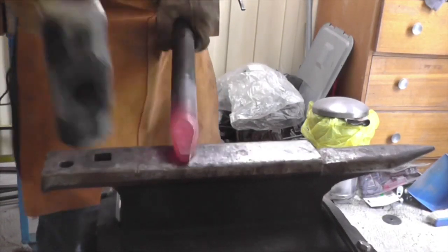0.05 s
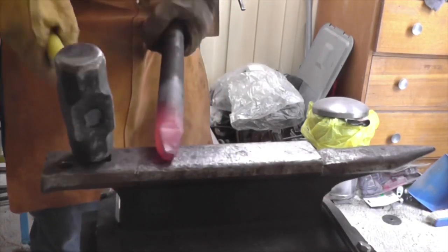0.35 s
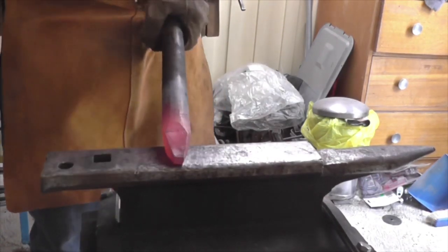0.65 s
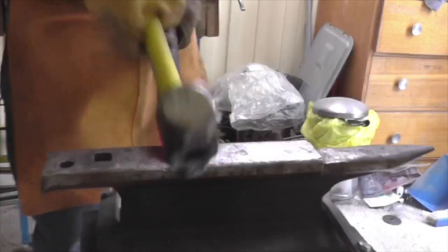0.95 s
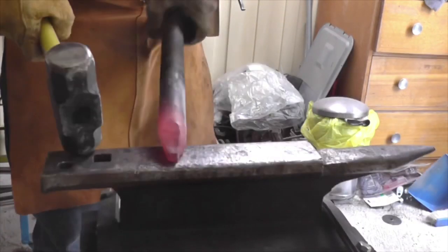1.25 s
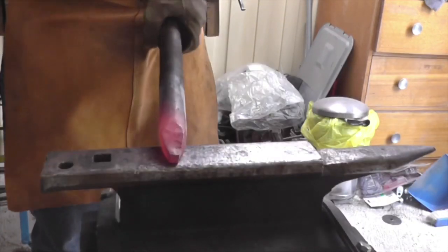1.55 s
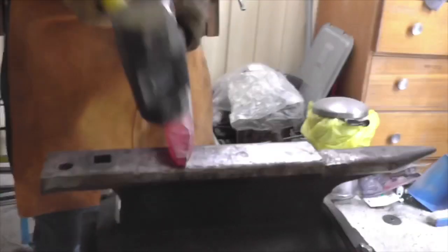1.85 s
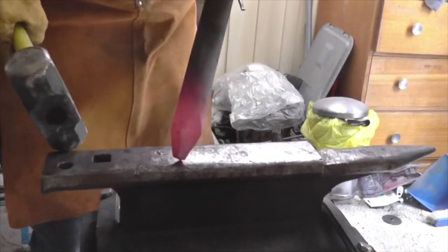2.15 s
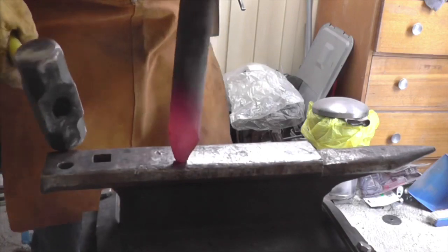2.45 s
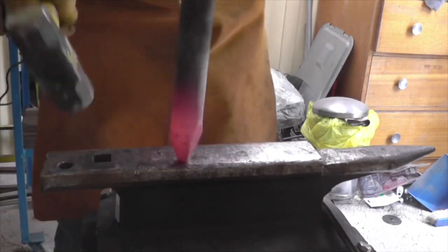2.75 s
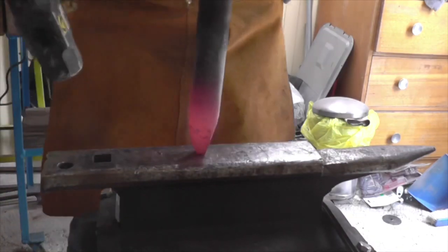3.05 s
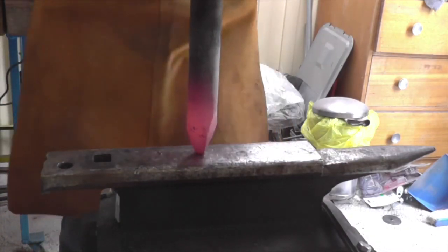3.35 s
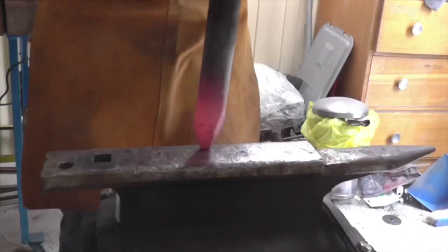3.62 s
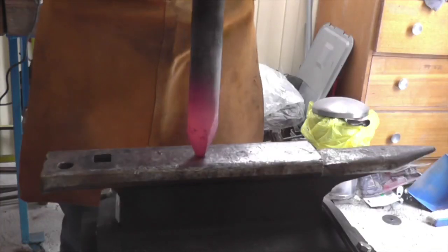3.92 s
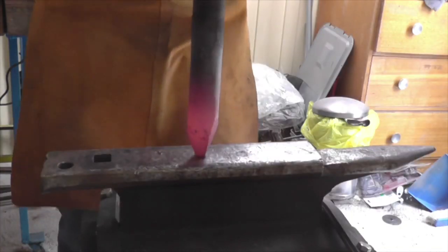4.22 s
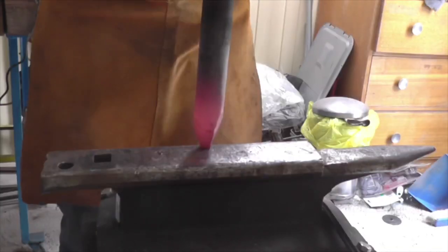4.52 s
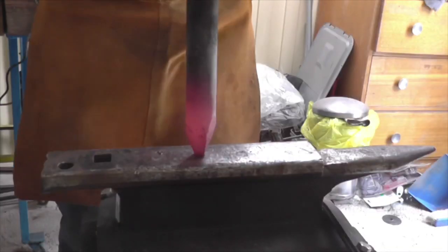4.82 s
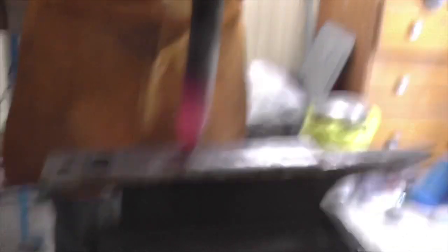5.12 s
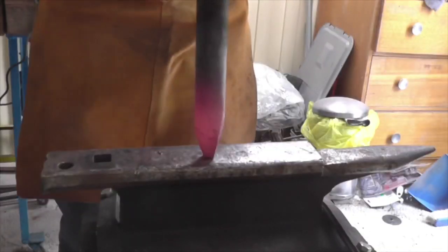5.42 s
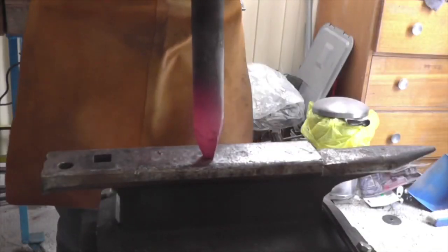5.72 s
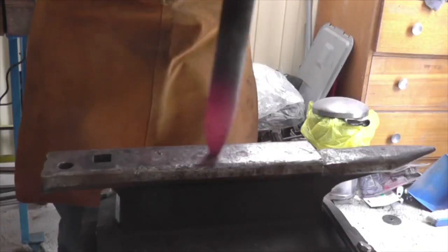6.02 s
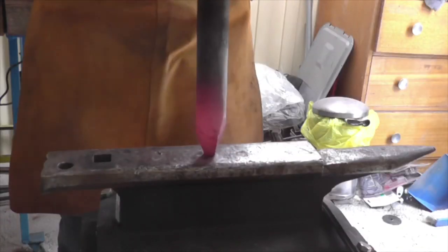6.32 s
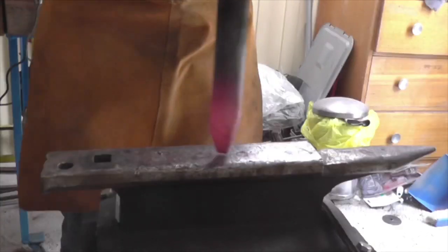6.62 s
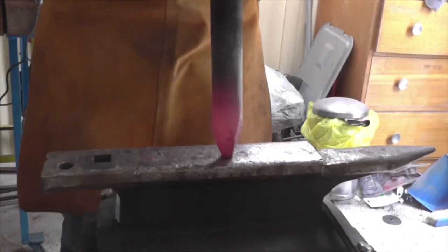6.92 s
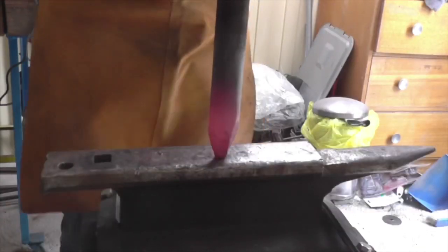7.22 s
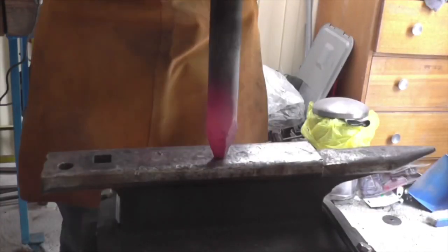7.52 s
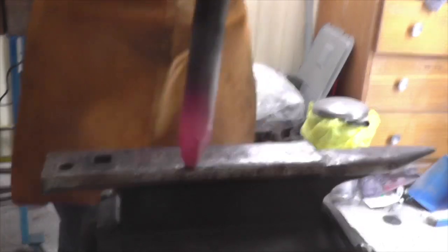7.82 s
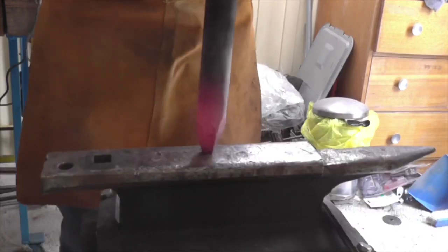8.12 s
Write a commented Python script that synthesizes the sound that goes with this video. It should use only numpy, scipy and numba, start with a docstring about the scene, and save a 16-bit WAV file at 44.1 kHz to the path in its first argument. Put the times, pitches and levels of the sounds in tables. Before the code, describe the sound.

A gas forge roars steadily in a small workshop. Right at the start, then at about 1 and 1.9 seconds, a hammer lands heavily on a hot steel bar on an anvil, each blow a sharp crash with a short ring and a dull knock. After each, the hammer is set down with a light clank, at about 0.3, 1.3 and 2.1 seconds. Following a pause, seven ringing blows hit the upright bar at roughly 3.5, 4.3, 5.2, 5.8, 6.5, 7.2 and 7.8 seconds, the first with a very short, shrill squeal. The bar's tip drops back onto the anvil with lighter clanks between many of the blows, and once more at about 8.1 seconds. The strikes are close and loud, with a brief room echo. Each one pushes the overall volume down, so the forge's roar ducks and swells back.

```python
"""A gas forge roars in a small workshop while a smith hammers a red-hot steel bar on an anvil.
First come three heavy blows on the bar lying flat; after each, the hammer is set down with a clank.
From 3.5 s come seven ringing blows on the upright bar, the first with a squeal of sliding steel.
Between blows, and once at the end, the bar's tip drops back on the anvil with a lighter clank.
All along, each blow drives the camera's automatic gain down, so the roar ducks and swells back."""
import sys
import numpy as np
from scipy import signal
from scipy.fft import rfft, irfft, next_fast_len
from scipy.io import wavfile
from scipy.ndimage import uniform_filter1d, map_coordinates
from numba import njit

SR = 44100
rng = np.random.default_rng(int(sys.argv[2]) if len(sys.argv) > 2 else 0)


def digitize_waveform(pressure):
    """Quantize a signal to 16-bit integers and store it at the path in sys.argv[1].

    Rows of a 2-D input are taken as channels; values are limited to [-1, 1].
    """
    field = np.atleast_2d(pressure).T
    bounded = np.clip(field, -1, 1)
    quanta = np.round(bounded * 32767).astype(np.int16)
    wavfile.write(sys.argv[1], SR, quanta)


N = 368676
AGE = np.arange(SR) / SR  # seconds since a hit


def hammer_blows():
    """Each blow crashes, rings anvil and bar, knocks the stand and jolts the camera through the floor."""
    # t/s, how the bar is held, force/dB, how firmly it sits on the anvil/dB, floor jolt/dB
    blows = [(0.0222, "flat", 21, 8.5, -8), (0.9666, "flat", 23, 0.5, -1), (1.8529, "flat", 21.5, 3, -17),
             (3.5394, "upright", 20.5, 6.5, -8), (4.3478, "upright", 20.5, 2, 1),
             (5.1794, "upright", 20.5, 1.5, -23), (5.8497, "upright", 19, -8, -17),
             (6.544, "upright", 20, 0, -7), (7.1904, "upright", 21.5, 4.5, -3),
             (7.8288, "upright", 20, 0.5, -8)]
    # ringing tones: f/Hz, level/dB, fade time/s (before the length factors below)
    anvil_tones = [(2722, -5, .55), (9590, -19, .25), (13940, -32, .6), (15615, -21, .2), (4130, -22, .18),
                   (4468, -19, .22), (6680, -24, .2)]
    flat_tones = [(399, -9, 0.11), (1085, -10, .1), (1865, -7, .1), (2610, 2, 0.099), (3230, -6, .12),
                  (6850, -4, 0.081)]
    upright_tones = [(3335, 0, .15), (4405, -15, .17), (5850, -13, .17), (10740, -16, .16),
                     (12770, -14, .14), (13945, -15, .15), (3900, -20, .15), (4150, -17, .15),
                     (4520, -17, .14), (4950, -21, .14), (5760, -18, .15), (6750, -19, .15),
                     (8576, -21, .14), (10050, -21, .15)]
    # tone colour of the crash: f/Hz, level/dB
    crash_colour = [(30, -8), (150, 3.5), (400, 5.5), (1200, 5.5), (2200, 3), (3000, 2.5), (4200, 4),
                    (5200, 2.5), (8000, 3), (10800, 5), (11800, 2.5), (14200, 5.5), (15500, -3.5)]
    # A flat bar passes the blow on to the stand; an upright one rings.
    # bar tones, bar level/dB, knock level/dB, anvil length factor, crash top treble/dB
    holds = {"flat": (flat_tones, -7.5, -11, .66, -3.5), "upright": (upright_tones, -2.8, -20, 0.44, -1.5)}
    cooling_db_per_s = .55  # as the bar cools and hardens, its low tones ring more strongly
    out = np.zeros((2, N))
    for start, hold, force_db, seat_db, jolt_db in blows:
        bar_tones, bar_db, knock_db, length, top_db = holds[hold]
        colour = [(hz, db + top_db * (hz > 11300)) for hz, db in crash_colour]
        crash = impact(colour, crack_t60=0.053, room_db=-8.5)
        length *= 2 ** (-seat_db / 13.5)  # a firmer seat drives the anvil harder but stops it sooner
        anvil = amp(seat_db - 10.5) * ring(anvil_tones, attack=0.0095, rough=0.77, left_db=4, length=length)
        cooled = [(hz, db + cooling_db_per_s * start * (hz < 3600), t60) for hz, db, t60 in bar_tones]
        bar = amp(bar_db) * ring(cooled, attack=0.0086, rough=.85, left_db=4.5, length=0.85)
        knock = amp(knock_db) * stand_knock()
        thump = amp(jolt_db) * floor_jolt()
        add(out, start, amp(force_db) * (crash + anvil + bar + knock + thump + chirp()))
    return out


def impact(colour, crack_t60, room_db):
    """Steel hits steel: a short crack of many packed tones, then the workshop's fading echo."""
    # f/Hz, how alike left and right are (1 = the same)
    likeness = [(100, 0.087), (600, 0.55), (3000, 0.4), (8000, 0.99), (14000, 0.63)]
    # the workshop's echo: f/Hz, fade time/s
    room_fade = [(60, 0.24), (400, 0.15), (1500, 0.27), (5000, 0.24), (10000, 0.22), (15500, 0.18)]
    burst = noise(lambda hz: along(colour, hz), likeness, SR, ripple_db=3.5)
    hz, t, bands = signal.stft(burst, SR, nperseg=256)
    decay = np.exp(-np.log(1000) * t / along(room_fade, hz)[:, None])
    echo = signal.istft(bands * decay, SR, nperseg=256)[1][:, :SR]
    return (burst * fade(crack_t60) + amp(room_db) * echo) * (1 - np.exp(-AGE / 0.00011))


def ring(tones, attack, rough, left_db, length=1, count=4):
    """Struck steel rings in fading tones; close neighbours make each waver differently left and right."""
    out = np.zeros((2, SR))
    for hz, db, t60 in tones:
        age = AGE[:int(SR * min(1, 1.5 * t60))]
        near_hz = hz * (1 + .008 * rng.standard_normal((count, 1)))
        weights = rng.standard_normal((2, count))
        neighbours = weights @ np.sin(2 * np.pi * (near_hz * age + rng.random((count, 1))))
        wave = np.sin(2 * np.pi * (hz * age + rng.random())) + rough * neighbours / np.sqrt(count)
        add(out, 0, amp(db + rng.uniform(1.5, 3)) * fade(t60 * length)[:len(age)] * wave)
    return out * (1 - np.exp(-AGE / attack)) * amp([[left_db / 2], [-left_db / 2]])


def stand_knock():
    """The anvil's stand takes the blow with a dull knock."""
    thud = filtered(rng.standard_normal(SR),
                    lambda hz: hz ** 2 / (hz ** 2 + 330 ** 2) / (1 + (hz / 1200) ** 4))
    return unit(thud) * fade(0.15)


def floor_jolt():
    """A low thump through the floor shakes the two microphones against each other."""
    rumble = filtered(rng.standard_normal(SR), lambda hz: 1 / (1 + (hz / 110) ** 2))
    return unit(rumble) * fade(0.061) * np.array([[1], [-.3]])


def chirp():
    """A short rising chirp follows a blow and ends in a faint falling ping."""
    out = amp(-13) * glide(hz=1468, hz_per_s=2400, attack=0.015, t60=.16)[None]
    add(out, .086, amp(-28.5) * glide(hz=1895, hz_per_s=-570, attack=.007, t60=0.16))
    return out


def skid():
    """The bar's point slides under the first upright blow with a very short, shrill squeal."""
    out = np.zeros((2, N))
    add(out, 3.5392, ring([(10700, 28, 0.023)], attack=0.00055, rough=0.4, left_db=1))
    return out


def hammer_rests():
    """The hammer head is set down on the anvil and rings briefly."""
    # t/s, force/dB, click/dB, ring/dB
    rests = [(.3218, -3, 1, -6), (1.2656, 0.5, -0.5, -9), (2.1386, -4.5, 5, -7)]
    # the head's tones: f/Hz, level/dB, fade time/s
    head_tones = [(2046, -1, .09), (3340, -10, .12), (4245, 0, .09), (3900, -10, .09), (6150, -9, .12),
                  (6720, -12, .07), (8750, -8, .06), (9950, -16, .07)]
    # tone colour of its click: f/Hz, level/dB
    click_colour = [(100, -30), (300, 2), (1600, 3), (2500, -4), (4400, -0.5), (5300, -11.5), (6700, -4),
                    (8000, -18), (8800, -13), (11000, -16), (15500, -26)]
    return taps(rests, head_tones, click_colour)


def tip_drops():
    """The bar's tip drops back on the anvil and rings briefly."""
    # t/s, force/dB, click/dB, ring/dB
    drops = [(1.3424, -16, 4, 9), (3.056, -19.5, -17, -3), (3.9795, -4.5, 1.5, 2), (4.6968, -13.5, -8, -3),
             (5.3952, -2, -4.5, -6), (6.1056, -9, -4, -4.5), (6.7222, -3, -6.5, -6),
             (8.1212, -3.5, -17, -2.5)]
    # the tip's tones: f/Hz, level/dB, fade time/s
    tip_tones = [(2280, -5.5, 0.098), (3400, -12, 0.19), (3900, -20, 0.16), (4230, -28, 0.18),
                 (6100, -26, 0.24), (9900, -24, .1), (11000, -32, 0.12)]
    # tone colour of its click: f/Hz, level/dB
    click_colour = [(100, -16), (800, -10), (1600, 6), (2800, -7.5), (5000, -5), (7000, -11), (9000, -21),
                    (10800, -8), (15500, -30)]
    return taps(drops, tip_tones, click_colour)


def taps(contacts, tones, colour):
    """Each light hit makes a click, a dull clank and the ring of the piece that lands."""
    # tones of steel touching loosely: f/Hz, level/dB, fade time/s
    clank_tones = [(273, -21, 0.15), (855, -3, 0.042), (1492, -5, 0.068), (1550, -8, 0.14),
                   (1661, -3.5, 0.085), (1680, -16, .07), (1896, -14.5, 0.11), (2710, -19.5, 0.21)]
    out = np.zeros((2, N))
    for start, force_db, click_db, ring_db in contacts:
        click = amp(click_db) * impact(colour, crack_t60=0.034, room_db=-17.5)
        clank = amp(-2.0) * ring(clank_tones, attack=0.00023, rough=0.43, left_db=0)
        steel = amp(ring_db - 3.5) * ring(tones, attack=0.00044, rough=0.59, left_db=4.5)
        add(out, start, amp(force_db) * walls(click + clank + steel, echo_db=-18.0))
    return out


def walls(x, echo_db, count=8):
    """Near walls and furniture send back weak, quick echoes, different at each microphone."""
    out = x.copy()
    for delay, gain in zip(rng.uniform(.008, .036, count), rng.normal(1, .3, (count, 2, 1))):
        add(out, delay, amp(echo_db) * gain * x)
    return out


def forge():
    """The swirling gas flame roars in a chamber that boosts some pitches and weakens others."""
    # broad roar and gas hiss: f/Hz, level/dB
    flame = [(25, -15), (100, -27), (200, -15), (300, -10.5), (420, 2.5), (850, -0.5), (1350, -8.5),
             (1650, -16.5), (2700, -24), (4500, -24.5), (6500, -19.5), (9800, -22), (11800, -35),
             (15500, -48.5)]
    # the chamber's peaks and dips: f/Hz, width/Hz, boost/dB
    chamber = [(153.6, 45, 10), (257, 34.6, 12.5), (341, 32, 8.5), (422.4, 50, 4.5), (531.6, 14, 8),
               (599, 35, 7), (637, 73, -10), (687.5, 63, 10.5), (710, 20, -3.5), (797.7, 50.7, 10),
               (884.5, 53, 6), (975, 20, -19), (1039, 30, 10.5), (1095, 26, 6.5), (1236, 30, 7),
               (1396.4, 61, 11), (1823, 30, 12.5), (3335, 87, 13.5)]
    # f/Hz, how alike left and right are (1 = the same)
    likeness = [(60, -1.05), (120, 0.26), (240, 0.98), (480, 0.99), (950, 0.98), (1890, 0.71), (3770, 0.49),
                (7520, 0.77), (15000, 0.62)]
    # f/Hz, left over right/dB
    balance = [(60, 4), (110, 2.5), (200, -0.5), (380, -0.5), (700, -1.0), (1290, -2.0), (2380, 0.5),
               (4400, -0.5), (8120, -2), (15000, 1)]
    def colour_db(hz):
        peaks_db = sum(db * 2 ** -((2 * (hz - centre) / width) ** 2) for centre, width, db in chamber)
        return along(flame, hz) + peaks_db
    roar = noise(colour_db, likeness, N, ripple_db=5)
    roar = filtered(roar, lambda hz: amp(along(balance, hz) * np.array([[.5], [-.5]])))
    return amp(-14.0 + 0.62 * wobble(22, N)) * roar


def noise(colour_db, likeness, size, ripple_db):
    """Stereo noise with a given tone colour and left-right likeness; echoes ripple its treble."""
    grid_hz = np.arange(0, SR, 28)
    comb = np.minimum(rng.standard_normal(len(grid_hz)), 1)  # echoes cut deep dips but boost little
    def response(hz):
        angle = np.arccos(np.clip(along(likeness, hz), -1, .995)) / 2
        ripple = ripple_db * np.interp(hz, grid_hz, comb) * np.interp(hz, [3000, 5000], [0, 1])
        return amp(colour_db(hz) + ripple) * np.array([np.cos(angle), np.sin(angle)])
    mid, side = filtered(rng.standard_normal((2, size)), response)
    return unit(np.array([mid + side, mid - side]))


def glide(hz, hz_per_s, attack, t60):
    """A tone that swells and dies while its pitch slides at a steady rate."""
    return np.sin(2 * np.pi * (hz + hz_per_s * AGE / 2) * AGE) * (1 - np.exp(-AGE / attack)) * fade(t60)


def fade(t60):
    """Die away by 60 dB in t60 seconds, the fade time."""
    return np.exp(-np.log(1000) * AGE / t60)


def amp(db):
    """Turn decibels into a volume factor."""
    return 10 ** (np.asarray(db) / 20)


def unit(x):
    """Scale a sound to an average power of 1."""
    return x / np.sqrt(np.mean(x ** 2) + 1e-20)


def along(points, hz):
    """Read between (f/Hz, value) points, with octaves evenly spaced."""
    freqs, values = np.transpose(points)
    return np.interp(np.log(hz + 1), np.log(freqs), values)


def wobble(rate, size):
    """A smooth curve through rate random points a second."""
    return map_coordinates(rng.standard_normal(4096), [np.arange(size) * rate / SR], mode="wrap")


def filtered(x, response):
    """Scale each frequency in x by response(hz)."""
    size = x.shape[-1]
    padded = next_fast_len(size + 8192)
    return irfft(rfft(x, padded) * response(np.fft.rfftfreq(padded, 1 / SR)), padded)[..., :size]


def add(track, start, sound):
    """Mix a sound into the track at start seconds."""
    part = track[:, round(start * SR):][:, :sound.shape[-1]]
    part += sound[..., :part.shape[-1]]


def power(x, window):
    """Running average power of both channels over window seconds."""
    return np.abs(uniform_filter1d(np.mean(x ** 2, axis=0), max(2, int(window * SR)))) + 1e-12


@njit
def gain_cut(excess, hold, release, deep_release, deep):
    """Volume cut in dB: follows any excess level at once, holds, then lets go, faster while deep."""
    cut, wait, out = 0.0, 0.0, np.empty(len(excess))
    for i in range(len(excess)):
        if excess[i] > cut:
            cut, wait = excess[i], hold * min(1.0, excess[i] / deep)
        elif wait > 0:
            wait -= 1
        else:
            cut = max(0.0, cut - (deep_release if cut > deep else release))
        out[i] = cut
    return out


def scene():
    """Anvil work in front of the forge."""
    return hammer_blows() + skid() + hammer_rests() + tip_drops() + forge()


def record(dry):
    """The camera squashes the loudest peaks, turns itself down for them and cuts the top treble."""
    squash, target_db, top_hz = .88, -10.5, 15800  # the steady roar sits just below the target
    squashed = dry * (1 + power(dry, window=0.0011) / amp(12.5) ** 2) ** (-squash / 2)
    # the volume ducks just ahead of each blow
    level = np.pad(power(squashed, window=.005), (10, 0), mode="edge")[:N]
    excess_db = 10 * np.log10(level) - target_db
    # hold is in samples, the release speeds in dB a sample
    cut_db = gain_cut(excess_db, hold=.1 * SR, release=33 / SR, deep_release=72 / SR, deep=11.8)
    levelled = squashed * amp(-uniform_filter1d(cut_db, size=30))
    return filtered(np.clip(levelled, -1, 1), lambda hz: hz < top_hz)


dry = scene()
out = record(dry)
digitize_waveform(out)
```